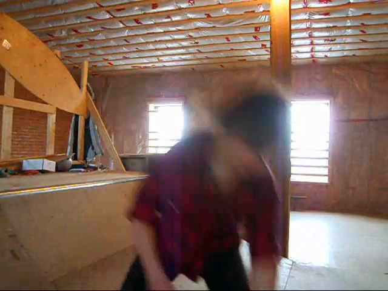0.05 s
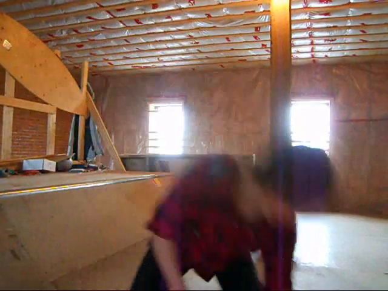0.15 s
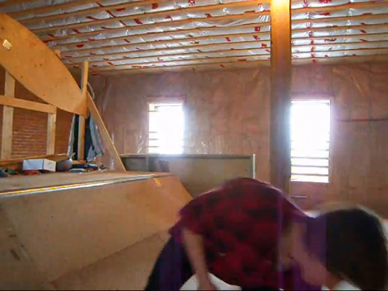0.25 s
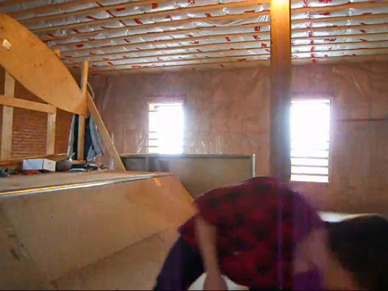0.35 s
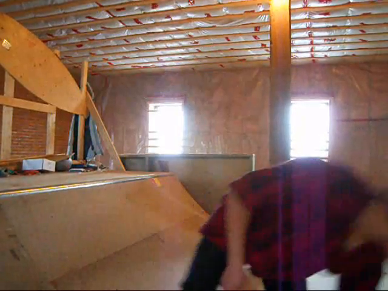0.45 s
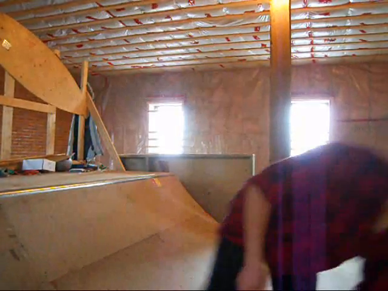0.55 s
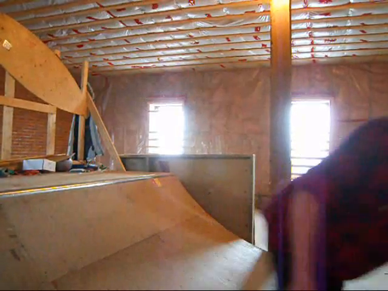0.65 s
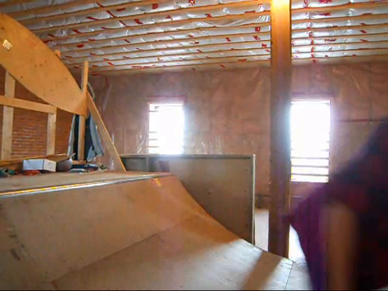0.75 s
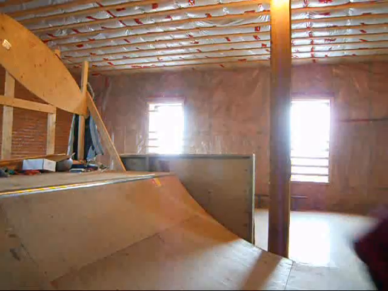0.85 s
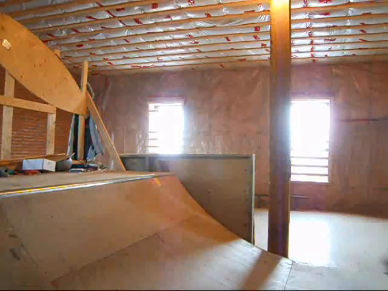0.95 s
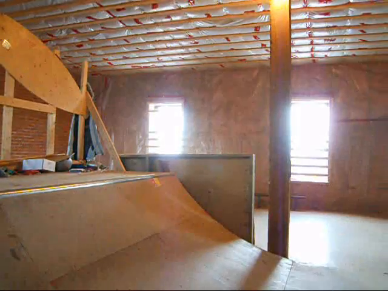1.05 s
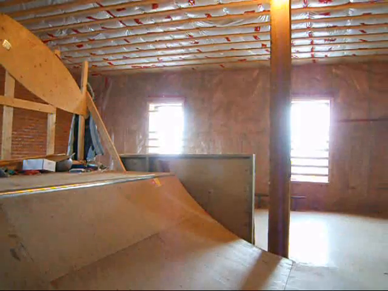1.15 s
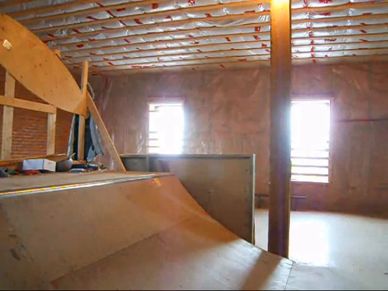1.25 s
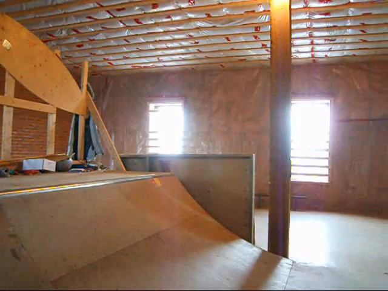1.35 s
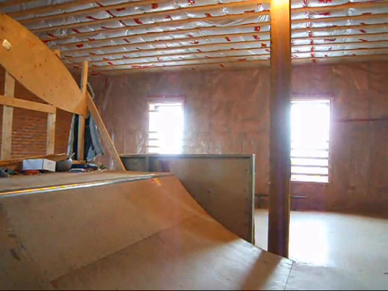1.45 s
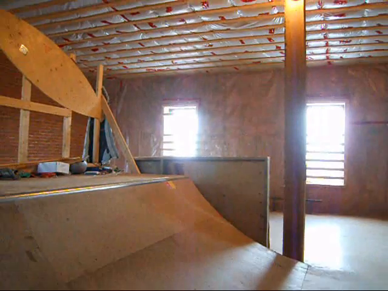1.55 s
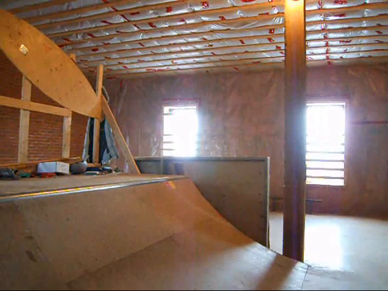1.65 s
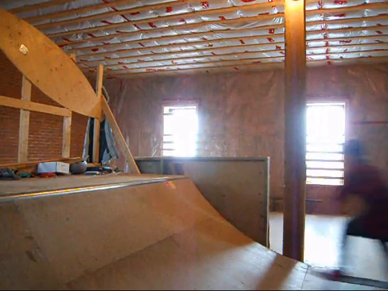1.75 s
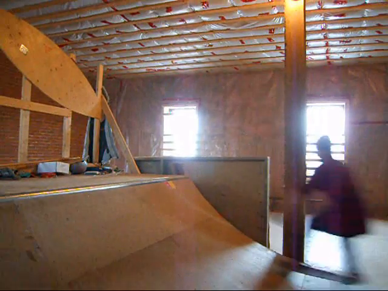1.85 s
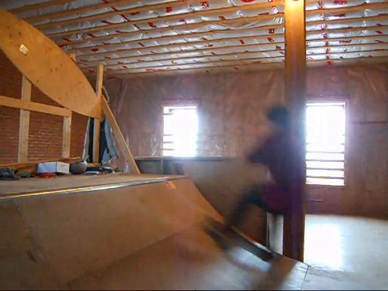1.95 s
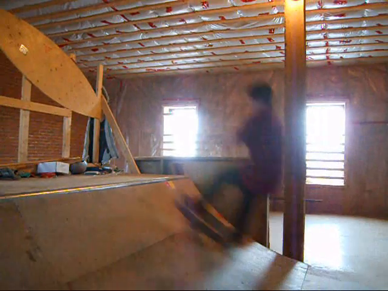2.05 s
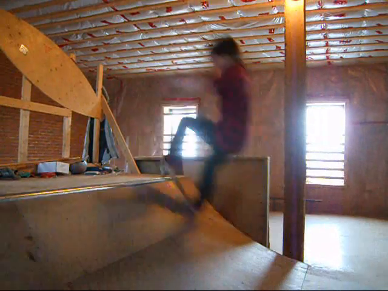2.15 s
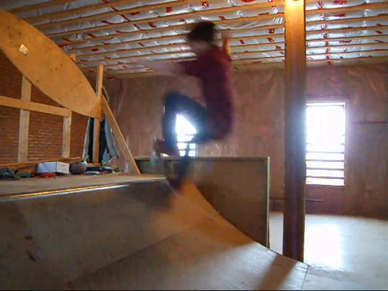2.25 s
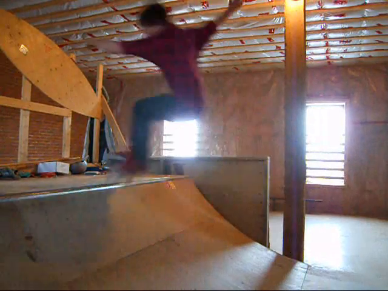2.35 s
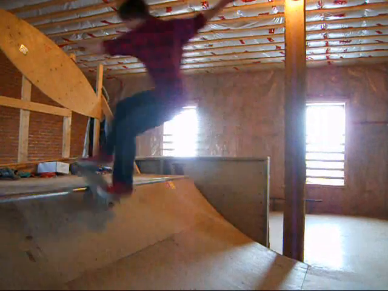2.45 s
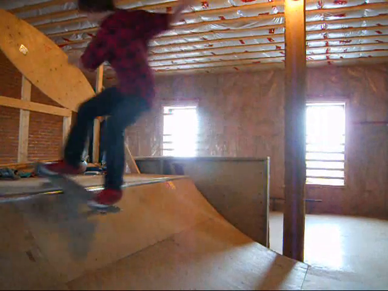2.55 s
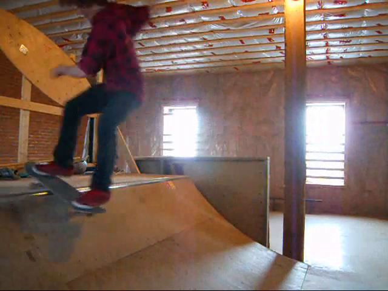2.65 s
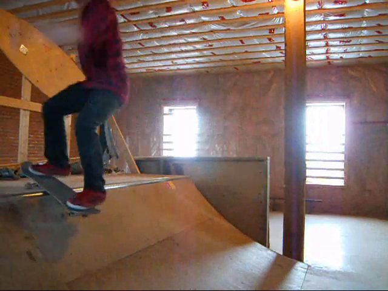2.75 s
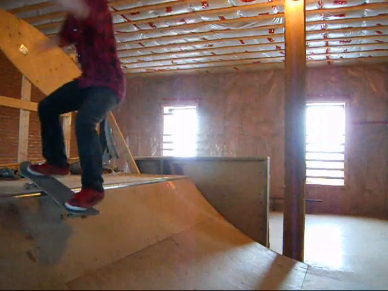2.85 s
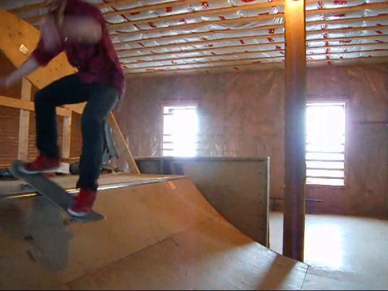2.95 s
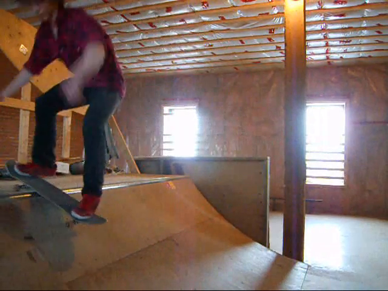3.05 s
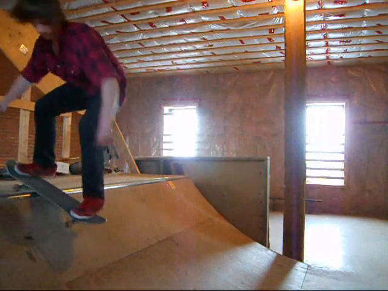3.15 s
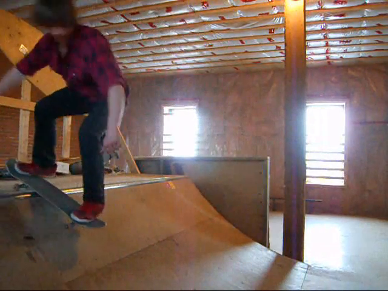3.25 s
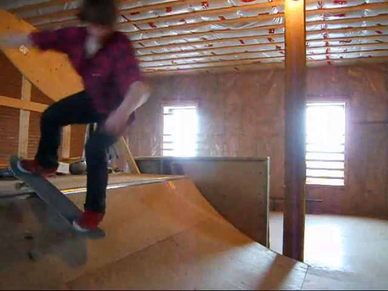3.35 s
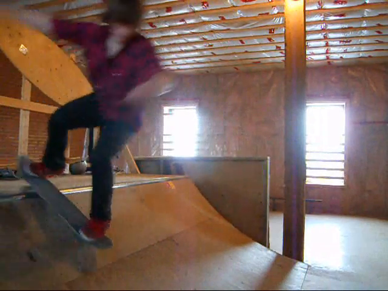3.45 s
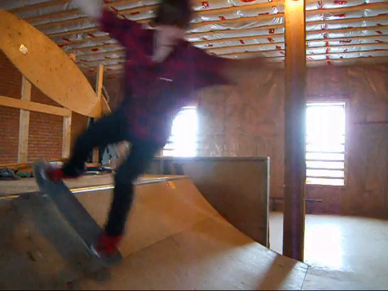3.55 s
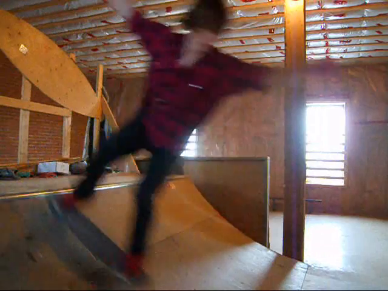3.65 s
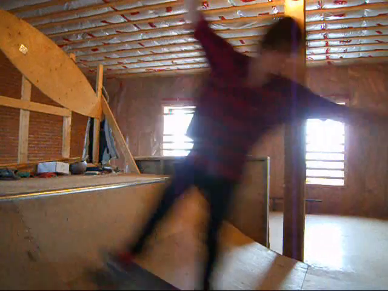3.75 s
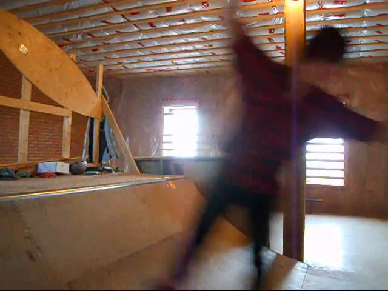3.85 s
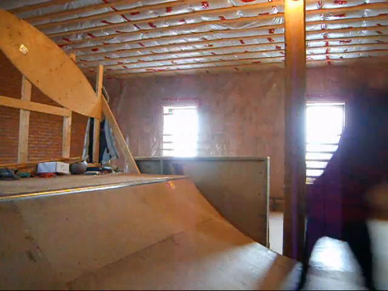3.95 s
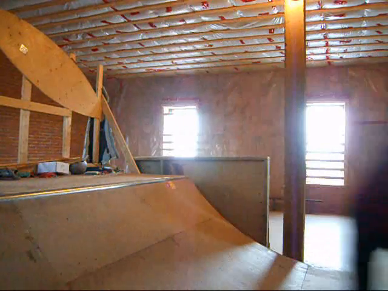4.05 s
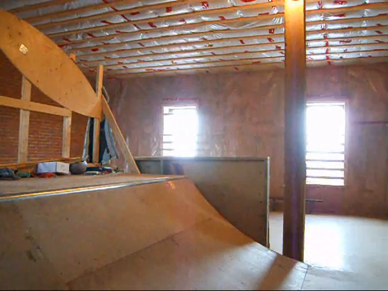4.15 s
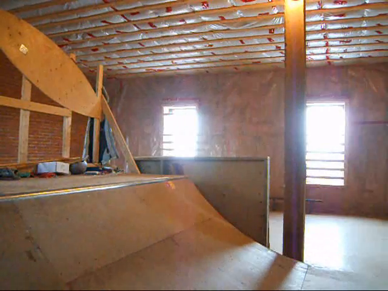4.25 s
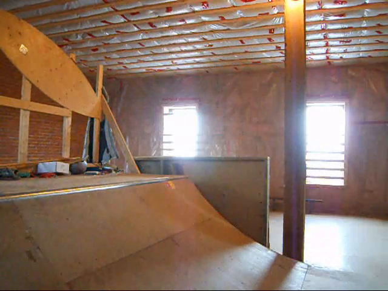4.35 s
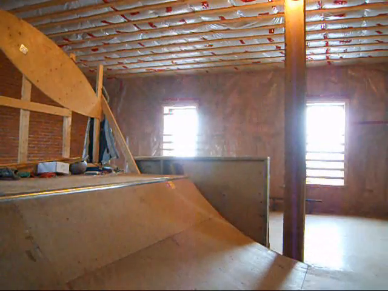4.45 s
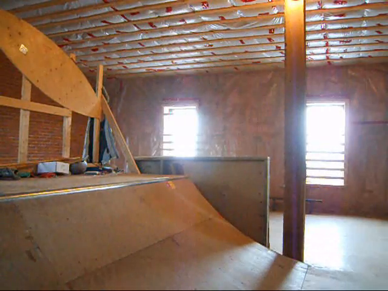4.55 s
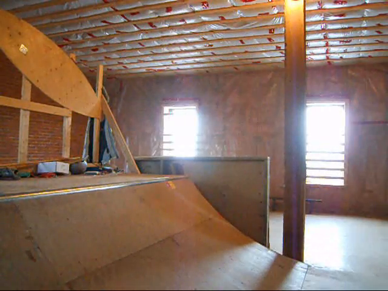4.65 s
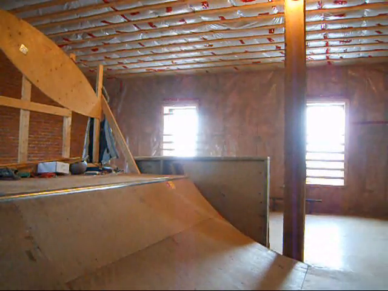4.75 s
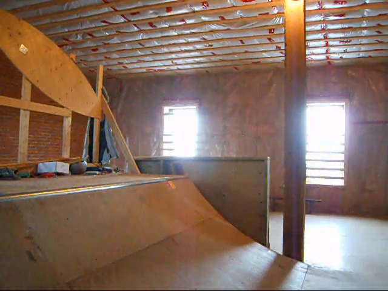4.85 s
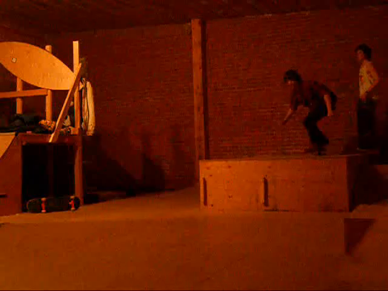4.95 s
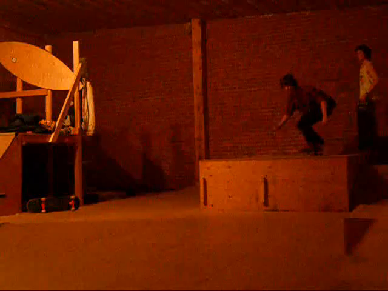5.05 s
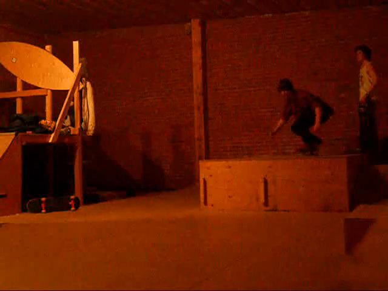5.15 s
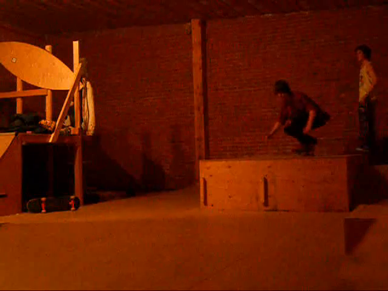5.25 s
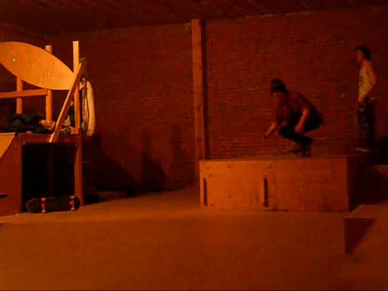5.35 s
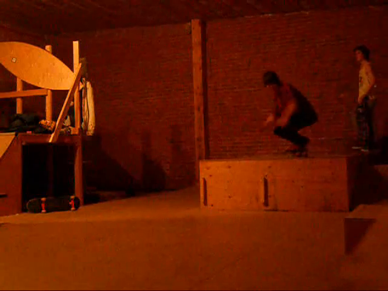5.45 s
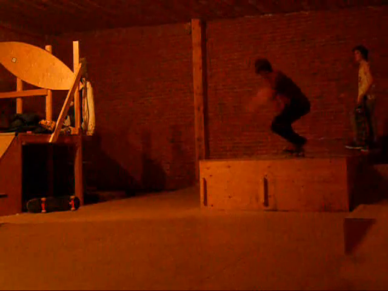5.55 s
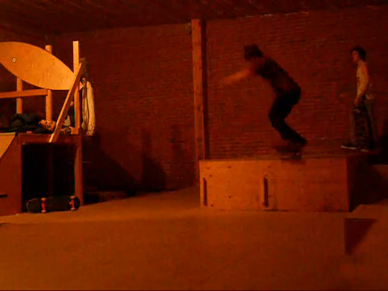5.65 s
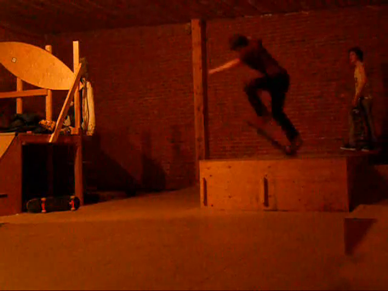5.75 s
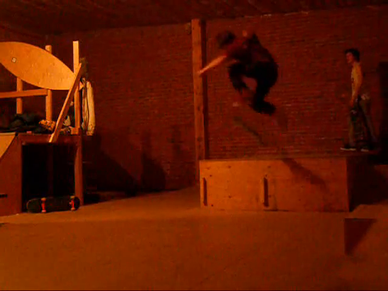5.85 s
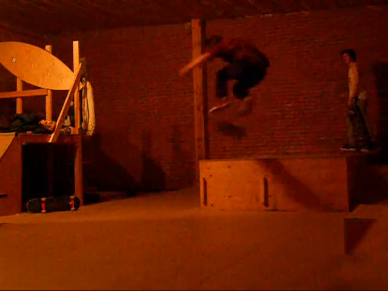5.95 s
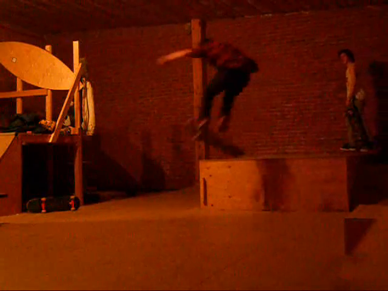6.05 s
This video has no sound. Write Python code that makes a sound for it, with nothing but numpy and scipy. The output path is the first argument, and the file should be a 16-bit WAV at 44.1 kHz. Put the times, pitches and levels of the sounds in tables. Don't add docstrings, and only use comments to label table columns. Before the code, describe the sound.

Wooden clacks and shoe scuffs open close to a low-quality camera microphone, followed by a light, distant roll. A skateboard climbs a booming plywood ramp over its joints, bangs into the metal edge, pauses, and descends with growing rumble. Abruptly, another rider rolls roughly on a hollow box, knocks the wood, presses on and pops into the air, in a loft with a short reverberation.

```python
import sys
import numpy as np
from scipy import signal
from scipy.fft import rfft, irfft, next_fast_len
from scipy.io import wavfile

SR = 44100
rng = np.random.default_rng(int(sys.argv[2]) if len(sys.argv) > 2 else 0)


def generate_wav(signal):
    frames = np.transpose(np.atleast_2d(signal))
    scaled = np.clip(frames, -1, 1) * 32767
    pcm = np.round(scaled).astype(np.int16)
    wavfile.write(sys.argv[1], SR, pcm)


def amplitude_ratio(level_db):
    exponent = np.asarray(level_db, float) / 20
    return 10 ** exponent


N = 268701
SCENE_CHANGE_S = 5.0

# (frequency [Hz], width [Hz], level [dB])
PLYWOOD_MODES = [(287, 43, -4.5), (360, 63, -0.5), (426.7, 58, 1), (495, 62, 1.5), (585, 61.5, 0.5),
                 (659.6, 60, -0.5), (811, 106, -8)]
# (frequency [Hz], width [Hz], level [dB])
HOLLOW_MODES = [(69, 7.4, -13.5), (84.1, 29, -2.5), (110, 21.8, -2), (129.2, 12, 0.5), (163.2, 22.6, 3.5),
                (200, 113, -1)]
# (frequency [Hz], density [dB per Hz])
METAL_SPECTRUM = [(2060, -7.5), (3500, -1.5), (4090, -4), (5930, -4.5), (7230, -7), (7700, -7),
                  (10000, -56.5), (16900, -120)]


def rms_one(x):
    return x / np.sqrt(np.mean(x ** 2) + 1e-20)


def in_time(rows):
    s, *columns = np.transpose(rows)
    return [np.interp(np.arange(N) / SR, s, column) for column in columns]


def at_hz(points, hz):
    known_hz, value = np.array(points).T
    return np.interp(np.log(hz + 1), np.log(known_hz), value)


def drift(rate_hz):
    step = 40
    r = np.exp(-2 * np.pi * step * rate_hz / SR)
    noise = rng.standard_normal(N // step + 2002)
    slow = signal.lfilter([1], [1, -2 * r, r * r], noise)[2000:]
    return np.interp(np.arange(N) / step, np.arange(len(slow)), rms_one(slow))


def band(x, lo_hz, hi_hz):
    sos = signal.butter(2, [lo_hz, min(hi_hz, .45 * SR)], "band", fs=SR, output="sos")
    return signal.sosfilt(sos, x + 1e-18)


def body(x, modes, widen):
    out, power = 0, 0
    for k, (hz, width_hz, level_db) in enumerate(modes):
        r = np.exp(-np.pi * widen * width_hz / SR)
        gain = (1 - r * r) / 2
        b = gain * np.array([1, 0, -1])
        a = [1, -2 * r * np.cos(2 * np.pi * hz / SR), r * r]
        sign = (-1) ** k
        out = out + sign * amplitude_ratio(level_db) * signal.lfilter(b, a, x + 1e-18)
        power += amplitude_ratio(2 * level_db) * gain
    return out / np.sqrt(power)


def sheet(x, modes, top_hz, widen):
    return signal.sosfilt(signal.butter(2, top_hz, fs=SR, output="sos"), body(x, modes, widen))


def coloured(x, spectrum):
    hz = np.linspace(0, SR / 2, 513)
    inside = (hz > spectrum[0][0]) & (hz < spectrum[-1][0])
    squared = amplitude_ratio(2 * at_hz(spectrum, hz)) * inside + 1e-6
    taps = signal.minimum_phase(signal.firwin2(511, hz, squared, fs=SR))
    return signal.oaconvolve(x, taps / np.linalg.norm(taps))[:len(x)]


def grit(per_s, spread_db, smooth):
    heights = amplitude_ratio(spread_db * np.minimum(rng.exponential(1, N), 4))
    heights = heights * rng.choice([-1, 1], N)
    bumps = rms_one(heights * (rng.random(N) < per_s / SR))
    return rms_one(bumps + smooth * rng.standard_normal(N))


def rolling():
    # (time [s], wheel speed as grind [dB], weight on the sheet as drum [dB])
    handling = [
        (0.0, -33.5, -32),
        (.17, -36.5, -34.5),
        (.32, -42.5, -49),
        (.37, -42, -56),
        (.52, -41, -31),
        (.62, -31, -22.5),
    ]
    run_up = [
        (.66, -37, -50),
        (.74, -47, -38.5),
        (.83, -44, -41.5),
        (.92, -44, -40),
        (.98, -38.5, -53),
        (1.13, -51.5, -50),
        (1.24, -50, -50.5),
        (1.48, -49, -45),
        (1.61, -48, -52),
    ]
    climb = [
        (1.65, -44, -29),
        (1.8, -39.5, -28.5),
        (1.91, -35.5, -23),
        (2.03, -33.5, -21),
        (2.17, -36, -26.5),
        (2.29, -35, -32),
        (2.36, -29.5, -27),
        (2.47, -44, -56),
    ]
    stall = [
        (2.55, -35, -31),
        (2.65, -41, -39.5),
        (2.81, -64, -65.5),
        (3.11, -63, -60.5),
        (3.27, -68, -71),
        (3.41, -70, -60.5),
        (3.48, -49.5, -49),
        (3.66, -43, -48),
    ]
    descent = [
        (3.69, -42, -34),
        (3.78, -43.5, -28),
        (3.94, -36.5, -24.5),
        (4.08, -35.5, -22.5),
        (4.3, -38, -27.5),
        (4.45, -36, -25.5),
        (4.63, -30, -23.5),
        (4.87, -27, -15.5),
        (5.0, -28, -14.5),
    ]
    box_ride = [
        (5.01, -24, -22.5),
        (5.18, -26.5, -30.5),
        (5.45, -30, -29),
        (5.5, -28.5, -30),
        (5.68, -25.5, -28.5),
        (5.745, -19, -20),
        (5.81, -19.5, -20),
        (5.89, -26.5, -43),
        (6.09, -44, -87),
    ]
    # (boom at middle weight [dB], bearing hiss at middle speed [dB],
    # tilt to upper sheet resonances [dB])
    surfaces = [
        (-29, -42.5, 2),
        (-40, -46.5, 7.5),
        (-28.5, -44, 2),
        (-38, -51, -1.5),
        (-28.5, -46, 1.1),
        (-24.5, -46, 0.5),
    ]
    # (frequency [Hz], density [dB per Hz])
    ramp_grind = [(410, -36.5), (700, -8), (978, -9.5), (1520, -9), (2570, -15), (2820, -16), (3820, -32.5),
                  (4500, -42), (5850, -36), (9900, -120)]
    box_grind = [(410, -42), (700, 1.5), (912, -6), (1400, 2), (2000, -1), (2430, -1.5), (2980, -10),
                 (4500, -18), (5850, -33), (9900, -120)]

    moves = zip([handling, run_up, climb, stall, descent, box_ride], surfaces)
    rows = [row + under for move, under in moves for row in move]
    grind_db, ply_db, boom_db, hiss_db, tilt_db = in_time(rows)
    boom_db = boom_db + 0.55 * (ply_db + 30)
    hiss_db = hiss_db + 0.78 * (grind_db + 40)
    press = drift(8.7)
    lumps_db = 1.5 * press + drift(9)

    bumps = grit(900, 4.5, 0.78)
    ply = amplitude_ratio(-tilt_db) * sheet(bumps, PLYWOOD_MODES[:4], top_hz=580.0, widen=0.74)
    ply += amplitude_ratio(tilt_db - 6.0) * sheet(bumps, PLYWOOD_MODES[4:], top_hz=970.0, widen=1.07)
    ply *= amplitude_ratio(ply_db + 0.26 * press + 1.3 * drift(38.5))

    boom = amplitude_ratio(boom_db + lumps_db) * sheet(grit(400, 3.0, 1), HOLLOW_MODES, top_hz=300., widen=1.21)

    wheels = grit(2500, 3.6, 1.03)
    on_ramp = np.arange(N) < SCENE_CHANGE_S * SR
    wheels = np.where(on_ramp, coloured(wheels, ramp_grind), coloured(wheels, box_grind))
    grind = amplitude_ratio(grind_db + 0.6 * press + 0.7 * drift(30)) * wheels

    bearings = coloured(grit(5000, 7.2, 3.1), METAL_SPECTRUM)
    hiss = amplitude_ratio(hiss_db + 0.91 * press + 0.25 * drift(30)) * bearings
    return ply + boom + grind + hiss


def friction_bursts(rows, width, rise):
    t = np.arange(SR // 4) / SR
    out = np.zeros(N + len(t))
    for s, level_db, hz, fade_s in rows:
        rub = rng.standard_normal(len(t)) * amplitude_ratio(4.7 * rng.standard_normal(len(t)))
        edges = hz * (1 - width / 2), hz * (1 + width / 2)
        rub = rms_one(band(band(rub, *edges), *edges))
        swell = (1 - np.exp(-t / (rise * fade_s))) * np.exp(-t / fade_s)
        at = round(s * SR)
        out[at:at + len(t)] += amplitude_ratio(level_db) * rub * swell
    return out[:N]


def snaps():
    # (time [s], rms level [dB], centre [Hz], fade [s])
    snap_events = [(.0002, -27, 4670, 0.068), (.3582, -15, 1200, 0.0029), (.6292, -3, 1643, 0.0033),
                   (.8402, -32, 580, .004), (1.0152, -40, 4970, 0.019), (1.1872, -37.5, 5240, 0.037),
                   (3.5182, -18, 3100, 0.0034), (3.5202, -29, 3030, 0.031), (4.6742, -8.5, 820, 0.0024),
                   (5.8622, -8, 3130, 0.0011), (5.8682, -4, 2760, 0.0047)]
    return friction_bursts(snap_events, width=0.99, rise=0.066)


def strike(response, levels_db, contact_s, click):
    t = np.arange(len(response)) / SR
    chatter = rng.standard_normal((len(levels_db), len(t))) * np.exp(-t / contact_s)
    chatter[:, 0] = click
    rings = signal.fftconvolve(chatter, response[None], axes=1)[:, :len(t)]
    rings *= (amplitude_ratio(levels_db) / np.abs(rings).max(axis=1))[:, None]
    sent = np.linalg.norm(rings, axis=1)[:, None] * response / np.linalg.norm(response)
    return np.array([rings, sent])


def knocks():
    # (time [s], blow into the wood [dB], deck clack [dB], tone of the struck spot [Hz])
    handled = [(.0864, -25.5, -39, 302), (.109, -25, -22, 610), (.1947, -23, -24, 110),
               (.2907, -33, -37, 626), (.3294, -6.5, -18.5, 700), (.3390, -8.5, -26.5, 730),
               (.3580, -13, -14.5, 640), (.4279, -40, -24, 493), (.4377, -21, -29, 580),
               (.4511, -30, -20, 440), (.4739, -25.5, -17, 640), (.5079, -31, -30, 435),
               (.5765, -25, -37.5, 622), (.6288, -8.5, -2.5, 478), (.6496, -27, -14.5, 495),
               (.841, -27, -39, 422), (.8624, -33, -47, 89), (.9436, -21.5, -24, 374),
               (1.1562, -41.5, -34, 524), (1.1874, -41, -30, 830), (1.2497, -35, -50, 146),
               (1.4904, -44, -38, 89.5), (1.5446, -35.5, -27, 520)]
    joints = [(1.6236, -19.5, -28, 189), (1.64, -35, -26.5, 122), (1.8923, -14, -25, 187),
              (1.968, -24, -18.5, 302), (1.9853, -18, -24, 592), (2.0782, -23, -22, 129),
              (2.0907, -13.5, -19, 524), (2.174, -20, -33, 210), (3.676, -28.5, -33, 358),
              (3.8007, -25.5, -31, 103), (3.8904, -33, -30, 409), (3.9506, -23, -22.5, 167),
              (4.0083, -15.5, -20, 129), (4.0367, -16, -21, 337), (4.0712, -15, -21, 159),
              (4.177, -21.5, -25.5, 157), (4.4204, -42, -26.5, 510), (4.5625, -12.5, -24, 161),
              (4.671, -9, -29, 162.3), (4.8386, -13.5, -38, 556)]
    coping = [(2.3014, -10, -4.5, 259), (2.3102, -20, -7.5, 101), (2.329, -18, -18, 420),
              (2.3492, -47, -25, 318), (2.4765, -15.5, -2, 208), (2.4867, -12, -3, 337),
              (2.4976, -9, 4.5, 725), (2.5098, -9.5, -17.5, 113), (2.5215, -14.5, -23.5, 105),
              (2.5808, -30.5, -29, 91.4), (2.8689, -58, -44, 500), (3.0298, -56.5, -44.5, 523),
              (3.05, -43.5, -44, 126), (3.0852, -57, -46, 482), (3.261, -54.5, -55.5, 131),
              (3.295, -47, -48.5, 89.7), (3.419, -36.5, -34, 137), (3.451, -31.5, -33.5, 85.5),
              (3.48, -27.5, -30.5, 94), (3.52, -20, -13.5, 146), (3.5352, -20, -21, 125),
              (3.5549, -23, -23, 101)]
    box = [
        (5.246, -11.5, -3, 697),
        (5.2542, -15, -6.5, 717),
        (5.2778, -22.5, -31, 476),
        (5.466, -21, -8.5, 99),
        (5.861, -24, 1.5, 485),
        (5.8666, -19.5, -12, 980),
        (5.8854, -42, -6.5, 685),
    ]
    # (frequency [Hz], width [Hz], level [dB])
    deck_modes = [(963, 140, 0), (1410, 530, 1.5), (2330, 320, 2.3), (2644, 240, 0.5), (3155, 710, -5)]

    kinds = [handled, joints, coping, box]
    s, wood_db, clack_db, spot_hz = np.vstack(kinds).T
    octaves = np.log2(spot_hz / 210)
    thud_db = wood_db - 11.5 * np.maximum(octaves, 0)
    knock_db = wood_db - 4 * np.maximum(-octaves, 0)
    # level at a clack of 0 dB, for each kind
    rattle_db = np.repeat([-16, -15, -19, -20], [len(kind) for kind in kinds])
    crack_db = rattle_db + 0.92 * clack_db

    click = signal.unit_impulse(SR // 8)
    deck = body(click, deck_modes, widen=0.84)
    hollow = sheet(click, HOLLOW_MODES, top_hz=370.0, widen=1.22)
    plywood = sheet(click, PLYWOOD_MODES, top_hz=2100.0, widen=1.73)
    trucks = coloured(click, METAL_SPECTRUM)
    parts = strike(deck, clack_db - 3.5, contact_s=0.0048, click=4.1)
    parts += strike(hollow, thud_db - 4.5, contact_s=0.0078, click=3.2)
    parts += strike(plywood, knock_db + 0.5, contact_s=0.0043, click=6.2)
    parts += strike(trucks, crack_db + 9.5, contact_s=0.0059, click=1.0)

    turns = spot_hz[:, None] * np.arange(len(click)) / SR
    low_spot = octaves < 0
    spot_db = np.where(low_spot, thud_db + 1.0, knock_db + 5.0)
    cycles = np.where(low_spot, 3., 2.8)[:, None]
    envelope = np.exp(-turns / cycles) * (1 - np.exp(-turns / 0.097))
    parts += amplitude_ratio(spot_db)[:, None] * np.sin(2 * np.pi * turns) * envelope

    share_db = np.select([s < 1.3, s < SCENE_CHANGE_S], [-10.5, -5.5], -0.5)
    parts[1] *= amplitude_ratio(share_db)[:, None]
    out = np.zeros((2, N + len(click)))
    for k, at in enumerate(np.round(s * SR).astype(int)):
        out[:, at:at + len(click)] += parts[:, k]
    return out[:, :N]


def rubs():
    # (time [s], rms level [dB], centre [Hz], fade [s])
    rub_events = [(.1082, -16.5, 750, 0.0074), (.1852, -20, 740, 0.0072), (.3302, -18.5, 1240, 0.0049),
                  (.4402, -30, 2200, 0.0095), (.4742, -11.5, 1040, 0.0035), (.9442, -25, 2090, 0.013),
                  (2.3062, -20, 1470, .03), (3.4852, -57, 6200, .013), (3.5302, -17, 314, 0.017),
                  (3.5352, -40, 7240, 0.046), (5.2502, -14.5, 3240, 0.0097), (5.4702, -26, 2370, 0.037),
                  (5.8702, -29, 1030, 0.057)]
    return friction_bursts(rub_events, width=.45, rise=.3)


def low_thumps():
    # (time [s], level [dB])
    thumps = [(.12, -19.5), (.22, -20), (.45, -29), (.66, -28), (.86, -28), (1.252, -26.5), (1.46, -32),
              (1.63, -34), (1.95, -35), (2.31, -42), (2.52, -17), (3.12, -38.5), (3.57, -26), (3.95, -44),
              (4.23, -44), (4.62, -42), (5.025, -17), (5.277, -17.5), (5.475, -17), (5.65, -24),
              (5.79, -28.5), (5.945, -31), (6.09, -29)]
    t = np.arange(N) / SR
    shake_db = np.full(N, -45.5)
    for s, level_db in thumps:
        away_db = np.maximum(294 * (s - t), 145 * (t - s))
        shake_db = np.maximum(shake_db, level_db - away_db)
    rumble = band(band(rng.standard_normal(N), 16.0, 60.), 11.0, 75.)
    return amplitude_ratio(shake_db + 0.57 * drift(11)) * rms_one(rumble)


def loft(x):
    # (frequency [Hz], time to fall 60 dB [s])
    decay = [(60, 0.51), (250, 0.37), (800, 0.27), (2000, 0.48), (5000, 0.73), (14000, 0.39)]
    # (frequency [Hz], level [dB])
    colour = [(60, 0.5), (250, -15), (800, 2), (2000, -10), (5000, -6.5), (14000, 3.5)]
    t = np.arange(SR) / SR
    answer = 0
    for hz in 45 * 2. ** np.arange(9):
        echoes = band(rng.standard_normal(SR), hz / np.sqrt(2), hz * np.sqrt(2))
        echoes = rms_one(echoes) * np.sqrt(hz / SR)
        answer = answer + amplitude_ratio(at_hz(colour, hz) - 60 * t / at_hz(decay, hz)) * echoes
    build_up = 1 - np.exp(-(t / 0.0031) ** 2)
    answer = answer * build_up * amplitude_ratio(-24.5)
    return signal.oaconvolve(x, answer)[:N]


def scene():
    wheels = rolling()
    scuffs = snaps() + rubs()
    direct, to_walls = knocks()
    tail = loft(to_walls + amplitude_ratio(-7.5) * scuffs)
    return (wheels + direct + scuffs + tail + low_thumps())[None]


def roll_off(x):
    return signal.sosfilt(signal.butter(12, 16400, fs=SR, output="sos"), x)


def record(dry):
    camera_rate_hz, top_hz = 16000, 15620
    guard = signal.cheby2(6, 30, 9300., fs=SR, output="sos")
    kept = signal.sosfilt(guard, 2.726 * np.tanh(dry / 2.535))
    mirrored = kept * (1 + 2 * np.cos(2 * np.pi * camera_rate_hz * np.arange(N) / SR))
    size = next_fast_len(N + SR // 4)
    hz = np.arange(size // 2 + 1) * SR / size
    hold = np.sinc(hz / camera_rate_hz) * (hz < camera_rate_hz)
    held = irfft(rfft(mirrored, size) * hold, size)
    top = np.clip((top_hz - hz) / 120, 0, 1) ** 2
    mix = irfft(rfft(np.clip(held, -1, 1)) * top, size)[:, :N]
    return roll_off(mix)


dry = scene()
out = record(dry)
generate_wav(out)
```